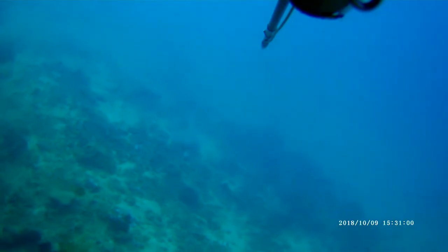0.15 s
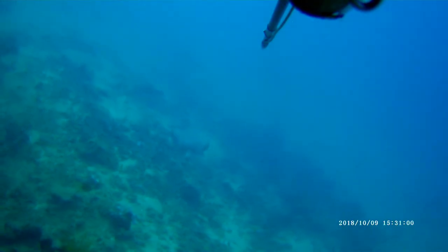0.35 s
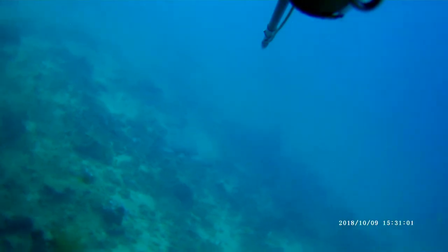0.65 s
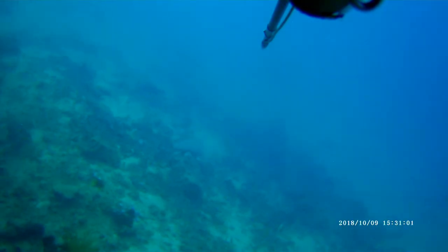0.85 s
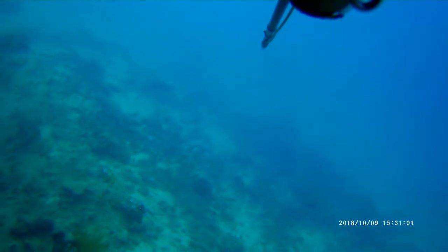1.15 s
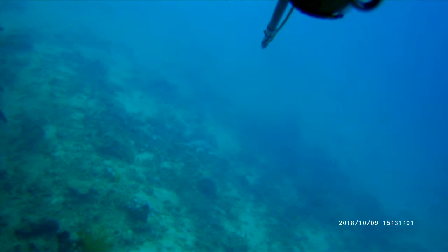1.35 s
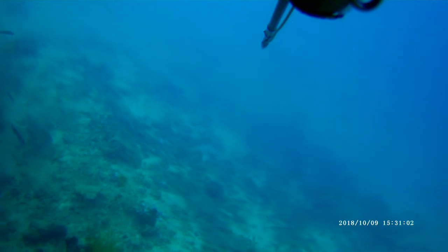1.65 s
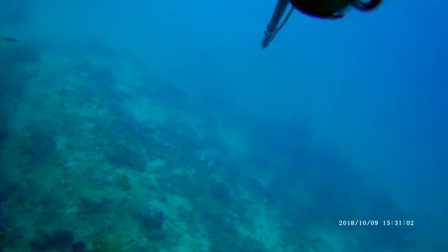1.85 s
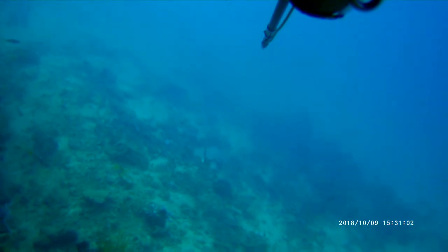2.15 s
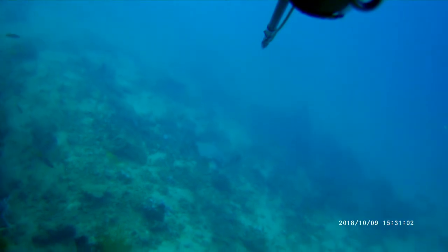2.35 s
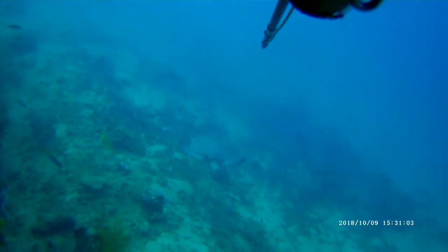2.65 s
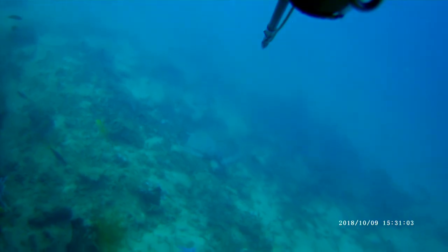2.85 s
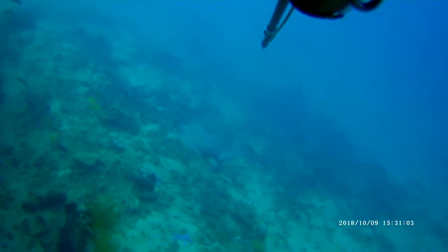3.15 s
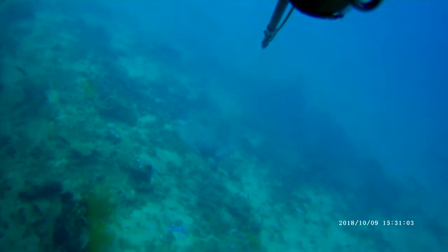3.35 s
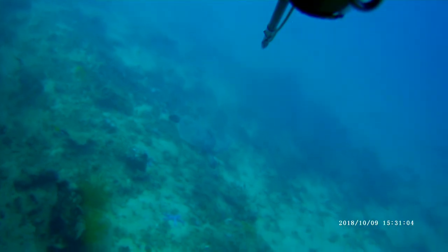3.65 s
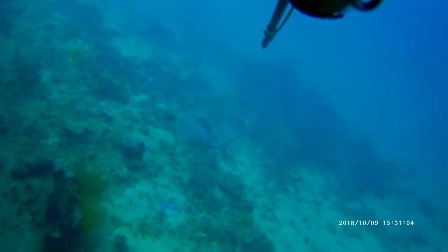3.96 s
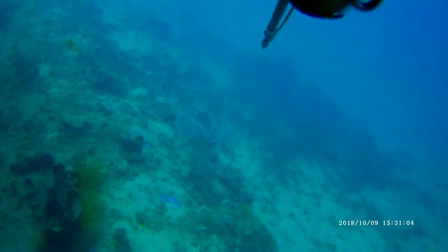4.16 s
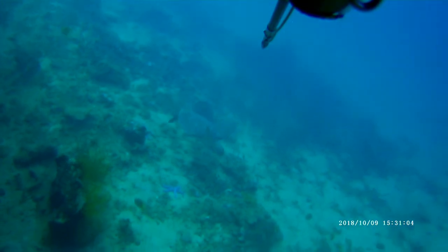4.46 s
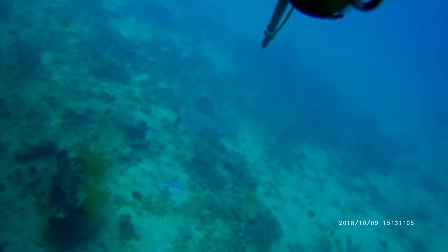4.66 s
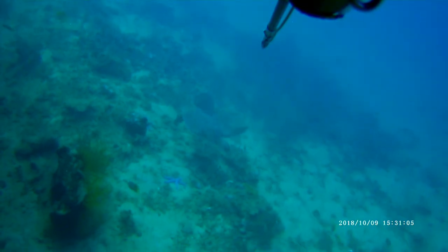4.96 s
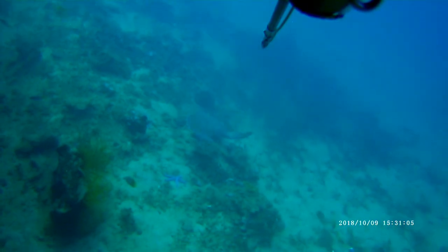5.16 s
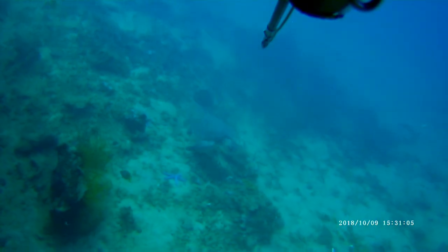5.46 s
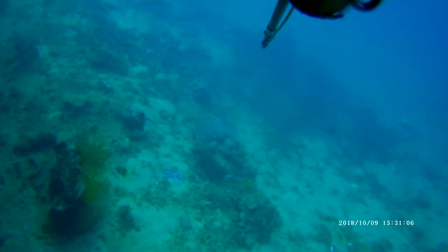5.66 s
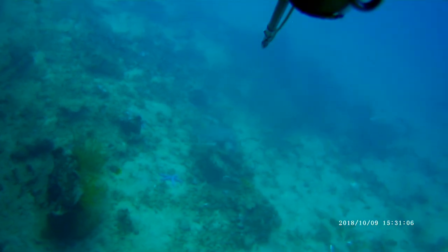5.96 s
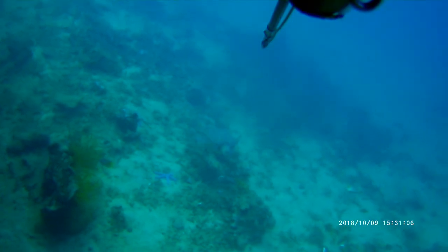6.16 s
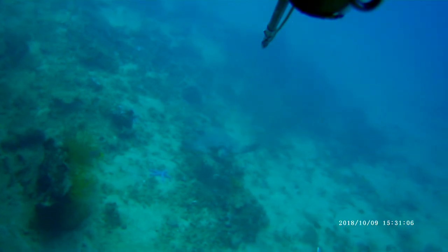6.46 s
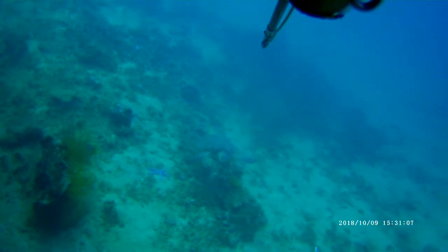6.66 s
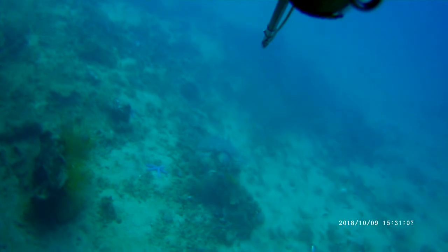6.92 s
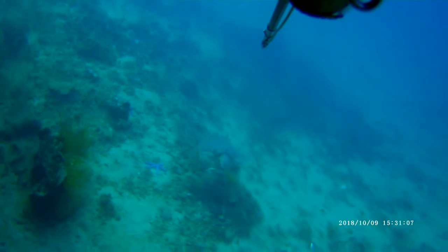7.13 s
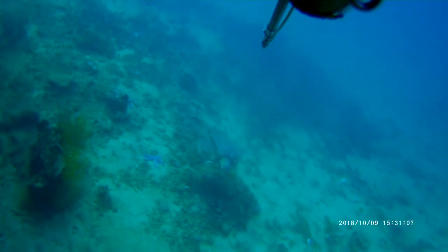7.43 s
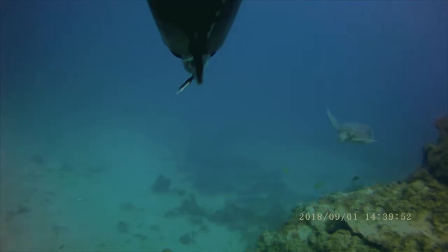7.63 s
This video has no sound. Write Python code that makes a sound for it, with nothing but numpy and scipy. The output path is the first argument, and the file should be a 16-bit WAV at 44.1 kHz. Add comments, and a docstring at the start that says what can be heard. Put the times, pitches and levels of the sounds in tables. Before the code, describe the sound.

A soft, muffled underwater hiss runs throughout, heard from inside a waterproof housing over a reef, with faint ticks, scattered shrimp snaps and a barely audible low hum and thin electronic whine. At 0.2 seconds a bubble plinks clearly, followed by a brief swish of water and light taps. From about 1.5 to 2.3 seconds a rig knocks on the case in a quick run of short, hollow, rebounding clicks. Faint taps and small plinks follow around 3 seconds. Harder single knocks come between 4 and 4.7 seconds, and at 4.5 seconds a very close shrimp snap, the loudest sound, briefly rings the shell. More sharp knocks follow from 5.6 to 6.6 seconds. From about 6.7 seconds small bubbles gurgle quietly along the case among lighter taps, snaps and plinks, until the end near 7.8 seconds.

```python
"""Reef from a camera housing

The microphone hangs over a reef inside a waterproof housing, in a soft, muffled hiss of water.
Right beside it the rig knocks on the housing and rebounds; shrimp snap near and far, one so close
that the shell rings. Bubbles plink, water swishes past the case, and near the end small bubbles
gurgle along it. Underneath, the current hums in the case and the electronics whine faintly."""
import sys
import numpy as np
from scipy import signal
from scipy.fft import rfft, irfft, next_fast_len
from scipy.io import wavfile
from scipy.ndimage import uniform_filter1d

SR = 44100
rng = np.random.default_rng(int(sys.argv[2]) if len(sys.argv) > 2 else 0)


def to_wav(sig):
    """Store sig (one row per channel, or 1-D mono) as 16-bit WAV at the path in sys.argv[1].

    Samples outside -1..1 are clipped; the rate is SR.
    """
    pcm = np.clip(np.atleast_2d(sig), -1, 1) * 32767
    pcm = np.round(pcm).astype(np.int16)
    wavfile.write(sys.argv[1], SR, pcm.T)  # frames by channels


N = 343539

# what the housing passes of a knock to the microphone: f/Hz, gain/dB
HOUSING_RESPONSE = [(60, -60.5), (300, -49.5), (520, -37), (720, -15), (850, -18), (1020, -4), (1200, -5.5),
                    (1410, 3.5), (1700, -4), (1950, -28), (2200, -21), (2650, -41.5), (3350, -41.5),
                    (4500, -72)]


def from_db(db):
    """Decibels to gain."""
    return 10 ** (np.asarray(db) / 20)


def unit(x):
    """Scales to rms 1."""
    return x / np.sqrt(np.mean(x ** 2) + 1e-20)


def colour_at(points, hz):
    """Reads rows of f/Hz, level/dB on a log-frequency axis."""
    f, db = np.transpose(points)
    return np.interp(np.log(hz + 1), np.log(f), db)


def level_of(rows):
    """A gain curve from rows of t/s, level/dB, fading to silence outside them."""
    s, db = np.transpose(rows)
    t = np.arange(N) / SR
    gate = uniform_filter1d(1. * ((t > s[0]) & (t < s[-1])), size=900)
    return from_db(np.interp(t, s, db)) * gate


def add(mix, s, sound):
    """Mixes a sound in at time s."""
    part = mix[max(round(s * SR), 0):][:len(sound)]
    part += sound[:len(part)]


def drift(per_s):
    """A smooth random curve of rms 1 that changes about per_s times a second."""
    size = next_fast_len(N)
    hz = np.fft.rfftfreq(size, 1 / SR)
    spectrum = rfft(rng.standard_normal(size)) * np.exp(-(hz / per_s) ** 2)
    return unit(irfft(spectrum, size)[:N])


def scatter(per_s, spread_db):
    """Random impulses, most of them small."""
    count = max(int(per_s * N / SR), 1)
    where, sign, chance = rng.random((count, 3)).T
    size = from_db(spread_db * np.minimum(-np.log(1 - chance), 4))
    return np.bincount((where * N).astype(int), size * np.sign(sign - .5), N)


def path_ripple(hz, step_hz=350):
    """A random ripple over frequency: every path through the water differs."""
    knots = np.arange(0, SR / 2, step_hz)
    return np.interp(hz, knots, rng.standard_normal(size=512)[:len(knots)])


def resonate(x, hz, width_hz):
    """A resonance applied twice, for steep skirts."""
    b, a = signal.iirpeak(hz, hz / (1.5 * width_hz), fs=SR)
    return signal.lfilter(b, a, signal.lfilter(b, a, x))


def wall(x, dead_hz=1590, width_hz=120):
    """The housing wall barely moves in one narrow band and keeps it from the microphone."""
    return signal.lfilter(*signal.iirnotch(dead_hz, dead_hz / width_hz, fs=SR), x)


def housing_click(colour, tint_db, lag_s=0, swell_s=0):
    """A click of peak 1 inside the case; lag_s lets the treble lead, swell_s delays the main ring."""
    size = len(tint_db) * 2 - 2
    hz = np.fft.rfftfreq(size, 1 / SR)
    rolloff_db = 30 * np.log2(np.maximum(hz / colour[-1][0], 1))
    db = colour_at(colour, hz) + tint_db - rolloff_db
    log_gain = np.log(from_db(np.maximum(db, -105)))
    minimum_phase = -signal.hilbert(np.r_[log_gain, log_gain[-2:0:-1]]).imag[:len(hz)]
    delay_s = .0005 + lag_s / (1 + (hz / 5800) ** 6) + swell_s / (1 + ((hz - 1350) / 550) ** 2)
    phase = minimum_phase - 2 * np.pi * (np.cumsum(delay_s) - delay_s[0]) * hz[1]
    fade = np.minimum(np.arange(size) / 20, 1) ** 2 * (1 - np.linspace(0, 1, size) ** 2) ** 2
    click = wall(irfft(np.exp(log_gain + 1j * phase))) * fade
    return click / abs(click).max()


def water_hiss(level_db=-66, ring_hz=1200, waver_db=4.5, floor_db=-101):
    """Steady noise of open water all around; the band in which the housing rings wavers."""
    # the water's spectrum at the microphone: f/Hz, relative level/dB
    spectrum = [(25, -40.5), (70, -24.5), (120, -20.5), (190, -10), (380, -1.5), (850, -2), (1020, -1),
                (1200, -1), (1420, 4), (2000, -6.5), (3400, -13), (4800, -18.5), (6600, -28), (9800, -46)]
    hz = np.fft.rfftfreq(N, 1 / SR)
    noise = unit(irfft(rfft(rng.standard_normal(N)) * from_db(colour_at(spectrum, hz)), N))
    ringing = resonate(noise, ring_hz, width_hz=390) * (from_db(waver_db * drift(per_s=18)) - 1)
    return from_db(level_db) * (noise + ringing) + from_db(floor_db) * rng.standard_normal(N)


def camera_whine():
    """Thin, slightly wavering tones of the electronics next to the microphone."""
    # pitch of each tone: f/Hz
    pitches = [5160, 7825, 7885]
    # unsteadiness and strength of each tone: waver/Hz, level/dB
    tones = [(18, -92), (5, -108), (5, -106)]
    out = np.zeros(N)
    for centre_hz, (waver_hz, db) in zip(pitches, tones):
        hz = centre_hz + waver_hz * drift(per_s=40)
        out += from_db(db) * unit(np.sin(2 * np.pi * np.cumsum(hz) / SR))
    return out


def current_drone(hz=160, width_hz=30):
    """The current keeps the lowest resonance of the case humming."""
    # the current drumming on the case: t/s, level/dB
    drumming = [(0, -86), (1.2, -99), (2.2, -98), (2.7, -83.5), (3.4, -92), (3.7, -91.5), (4.25, -82.5),
                (4.6, -99), (7.79, -95.5)]
    return unit(resonate(rng.standard_normal(N), hz, width_hz)) * level_of(drumming)


def snap(loss_db_per_octave, size=1024):
    """One collapsing cavity, heard through the shell and tilted above 4 kHz."""
    # what the housing passes of a snap: f/Hz, gain/dB
    response = [(60, -40), (600, -18.5), (1400, 8), (2000, 2), (2850, -9), (3400, 0), (3900, -9.5),
                (4600, 1.5), (5500, -9), (6450, -0.5), (7300, -10.5), (8800, -13), (10200, -38.5),
                (15000, -47.5)]
    hz = np.fft.rfftfreq(size, 1 / SR)
    treble_loss_db = loss_db_per_octave * np.log2(np.maximum(hz / 4000, 1))
    return housing_click(response, 2.5 * path_ripple(hz) - treble_loss_db, lag_s=0.00064)


def shrimp(gain_db=3, far_db=-85, echo_db=-9):
    """Snaps close by, each with a quick echo off the rig, over a crackle from far across the reef."""
    # near snaps: t/s, peak before gain_db/dB, treble loss/(dB per octave)
    near_snaps = [(0.4793, -52.5, 7), (1.028, -53.5, 8), (1.07, -52.5, 11), (1.687, -56.5, 4),
                  (1.755, -50, 7), (1.7913, -51.5, 12), (1.893, -40.5, 0.5), (2.0676, -52, -2),
                  (2.381, -53.5, 12), (2.6394, -58, 7), (2.8105, -52, 7), (2.957, -58, 8),
                  (3.2403, -58.5, 2), (3.5221, -53, -2), (3.5868, -52, 6), (3.9568, -54.5, 3),
                  (4.3846, -53.5, 6), (4.8037, -46, -0.5), (4.994, -44, 9), (6.8665, -39, 11.5),
                  (7.037, -51, 21), (7.636, -51.5, 18), (7.6793, -57, 8)]
    near = np.zeros(N)
    for s, db, treble_loss in near_snaps:
        click = from_db(db + gain_db) * snap(treble_loss)
        add(near, s, click)
        add(near, s + rng.uniform(0.00169, .003), from_db(echo_db) * click)
    far = sum(signal.oaconvolve(scatter(per_s=5, spread_db=3.5), snap(loss_db_per_octave=3))[:N]
              for _ in range(8))
    return near + from_db(far_db) * unit(far)


def thud(pitch_hz, softness, narrow_db=22, sag=0.93, size=2048):
    """One touch on the housing; a soft one rings only a band centred a little below pitch_hz."""
    hz = np.fft.rfftfreq(size, 1 / SR)
    ripple_db = 1.8 * path_ripple(hz)
    octaves_off = np.log2((hz + 1) / (sag * pitch_hz))
    band_db = -np.minimum(narrow_db * octaves_off ** 4, 20)
    return housing_click(HOUSING_RESPONSE, softness * (ripple_db + band_db), swell_s=0.00093)


def patter(level_db=-70):
    """Faint ticks of the rig and of drifting grit on the case, at seven pitches."""
    ticks = sum(signal.oaconvolve(scatter(per_s=7, spread_db=4), thud(hz, softness=0.85))[:N]
                for hz in np.geomspace(700, 1700, num=7))
    return from_db(level_db) * unit(ticks)


def rig_knocks(hard_db=-22, soft_range_db=6, lead_s=.0009,
               rebound_s=.0135, throw_s_per_db=0.3, rebound_hz=1470, settle_db=-17):
    """The rig taps the housing, rebounds and settles; strong blows are harder and so wider in band."""
    # blows right beside the microphone: t/s, peak/dB, pitch/Hz, rebound relative to the blow/dB
    blows = [(.072, -43.5, 1300, -17), (.47, -43.5, 1410, -13), (.572, -42.5, 1500, -15),
             (.746, -41.5, 1430, -11), (1.192, -48, 1500, -15), (1.46, -27.5, 1324, -4),
             (1.518, -27, 1340, -9.5), (1.557, -27.5, 1360, -6.5), (1.621, -28, 1330, -7.5),
             (1.731, -27.5, 1400, -5.5), (1.813, -43, 1470, -8), (1.882, -28.5, 1360, -11),
             (2.23, -45, 1400, -15), (2.309, -27, 1420, -9), (2.406, -43, 1460, -17),
             (2.56, -46.5, 1330, -7), (2.866, -40.5, 1250, -3), (3.077, -43, 1330, -15),
             (3.408, -44, 1340, -14), (4.047, -23, 1350, -19), (4.417, -22, 1390, -22),
             (4.636, -22, 1390, -25), (5.588, -19.5, 1410, -24), (5.828, -20, 1440, -24),
             (5.971, -23.5, 1400, -12), (6.104, -30, 1280, -8.5), (6.434, -23.5, 1400, -14),
             (6.5754, -18, 1413, -18.5), (6.885, -34.5, 1350, -9), (7.078, -39, 1390, -4.5),
             (7.307, -37.5, 1290, -12), (7.477, -28.5, 1420, -7.5), (7.504, -35, 1360, -5.5),
             (7.587, -29.5, 1230, -6), (7.628, -37, 1480, -2.5)]
    out = np.zeros(N)
    for s, peak_db, pitch_hz, rebound_db in blows:
        flight_s = rebound_s + throw_s_per_db * max(peak_db - hard_db, 0)  # hard blows throw it farther
        touches = [(peak_db, pitch_hz),
                   (peak_db + rebound_db, rebound_hz),
                   (peak_db + rebound_db + settle_db, rebound_hz)]
        for k, (db, hz) in enumerate(touches):
            softness = np.clip((hard_db - db) / soft_range_db, 0, 1)
            add(out, s - lead_s + k * flight_s, from_db(db) * thud(hz, softness))
    return out


def rig_ring(x, wet_db=-19, ring_hz=1380, t60_s=.1):
    """The rig keeps shivering briefly after each blow."""
    t = np.arange(SR // 4) / SR
    tail = rng.standard_normal(len(t)) * np.exp(-np.log(1000) * t / t60_s) * (t > .004)
    wet = signal.oaconvolve(resonate(x, ring_hz, width_hz=1200), tail / np.linalg.norm(tail))[:N]
    return x + from_db(wet_db) * wet


def bubbles(glide_s=0.016, wobble=0.017):
    """Each bubble rings as a dying sine whose pitch wobbles and slides as it settles."""
    # single bubbles outside the wall: t/s, peak/dB, first f/Hz, last f/Hz, rise/s, t60/s
    plinks = [(0.2047, -28, 1648, 1500, 0.002, 0.089), (0.2053, -45, 983, 957, 0.0011, 0.14),
              (2.866, -54.5, 930, 940, 0.0013, 0.044), (3.049, -46.5, 1515, 1560, .002, 0.038),
              (3.076, -50.5, 553, 520, 0.0028, 0.024), (3.129, -51.5, 1026, 1050, 0.0017, 0.063),
              (3.409, -52.5, 964, 1030, 0.00087, 0.052), (6.915, -50, 2145, 2100, 0.0026, 0.046),
              (7.026, -38.5, 1353, 1570, 0.013, 0.052), (7.412, -54, 2650, 2440, .003, .025)]
    out, t = np.zeros(N), np.arange(SR // 4) / SR
    for s, db, first_hz, last_hz, rise_s, t60_s in plinks:
        glide_hz = last_hz + (first_hz - last_hz) * np.exp(-(t / glide_s) ** 2)
        hz = glide_hz * (1 + wobble * drift(per_s=290)[:len(t)])
        swell = (1 - np.exp(-(t / rise_s) ** 2)) * np.exp(-np.log(1000) * t / t60_s)
        add(out, s, from_db(db) * swell / swell.max() * np.sin(2 * np.pi * np.cumsum(hz) / SR))
    return wall(out)


def swish(gain_db=-2, band_hz=(125, 1900)):
    """Fluttering flow stirs the low resonances of the case; the swish carries little treble."""
    # water brushing past the case, one list a pass: t/s, level before gain_db/dB
    passes = [
        [(.27, -63), (.33, -57.5), (.37, -46.5), (.40, -44.5), (.44, -56), (.49, -59.5), (.53, -58), (.58, -68),
         (.66, -84)],
        [(4.08, -62), (4.17, -62), (4.22, -59.5), (4.29, -63.5), (4.38, -75)],
    ]
    # resonances of the case: f/Hz, width/Hz, relative level/dB
    modes = [(154, 32, -15.5), (258, 29, -9.5), (626, 87, -13), (1067, 172, 6), (1240, 180, -8.5)]
    flow = rng.standard_normal(N) * from_db(1.5 * drift(per_s=110))
    muffled = signal.sosfilt(signal.butter(3, band_hz, "bandpass", fs=SR, output="sos"), flow)
    body = sum(from_db(db) * unit(resonate(muffled, hz, width_hz)) for hz, width_hz, db in modes)
    return from_db(gain_db) * unit(body) * sum(level_of(rows) for rows in passes)


def crack(at_s=4.4604, peak_db=-12):
    """A snap so close that the whole housing rings with it."""
    # the ringing shell: f/Hz, relative level/dB
    spectrum = [(100, -65), (500, -40), (1000, -17), (1420, 2), (2050, -25), (2450, -8.5), (2850, -29.5),
                (3380, -9), (3750, -23.5), (4500, -3.5), (5800, -26), (6400, -20.5), (8300, -56.5),
                (15000, -71.5)]
    out = np.zeros(N)
    add(out, at_s, from_db(peak_db) * housing_click(spectrum, tint_db=np.zeros(513), lag_s=0.0012))
    return out


def gurgle(gain_db=-1, t60_s=0.031, rise_s=0.0006, colour_share=0.75):
    """Small bubbles of many sizes run together; the housing favours those near its own pitch."""
    # two waves of bubbles along the case: t/s, level before gain_db/dB
    waves = [(6.68, -65.5), (6.89, -55), (7.09, -58.5), (7.12, -65.5), (7.17, -55.5), (7.30, -50),
             (7.35, -54), (7.63, -51), (7.67, -69), (7.79, -65)]
    pops, t = np.zeros(N), np.arange(2048) / SR
    clumps = from_db(1.5 * drift(per_s=45))
    for hz in np.geomspace(880, 2900, num=20):
        chirp = np.sin(2 * np.pi * hz * t * (1 + rng.uniform(-0.71, 5.3) * t))
        blip = chirp * (1 - np.exp(-t / rise_s)) * np.exp(-np.log(1000) * t / t60_s)
        births = scatter(per_s=55, spread_db=2.5) * clumps
        housing_gain = from_db(colour_share * colour_at(HOUSING_RESPONSE, hz))
        pops += housing_gain * signal.oaconvolve(births, blip)[:N]
    return from_db(gain_db) * unit(wall(pops)) * level_of(waves)


def scene():
    """The reef from one microphone inside the housing."""
    contacts = rig_ring(rig_knocks() + patter() + gurgle())
    events = contacts + crack() + shrimp() + bubbles() + swish()
    return (events + current_drone() + water_hiss() + camera_whine())[None]


def record(dry, edge_hz=15500):
    """The recorder's band limit."""
    lowpass = signal.firwin(511, edge_hz, window=("kaiser", 9), fs=SR)
    return signal.oaconvolve(dry, lowpass[None], "same")


dry = scene()
out = record(dry)
to_wav(out)
```